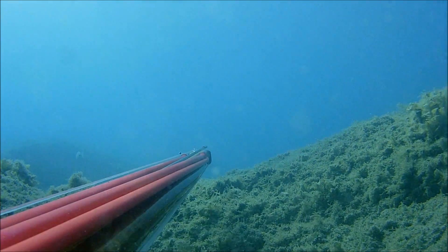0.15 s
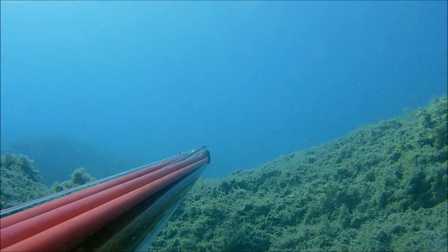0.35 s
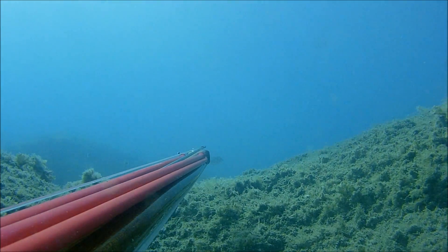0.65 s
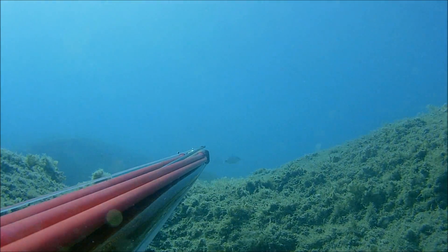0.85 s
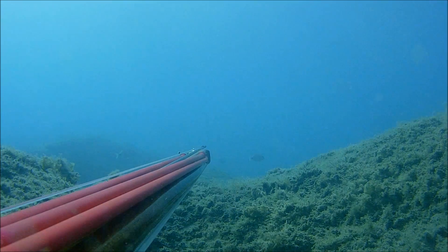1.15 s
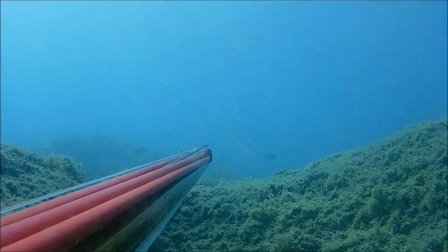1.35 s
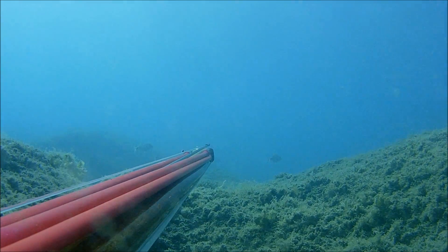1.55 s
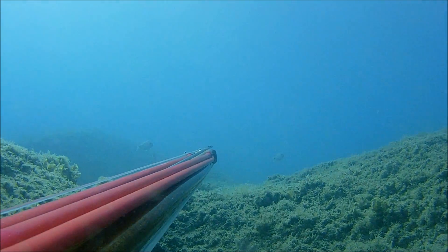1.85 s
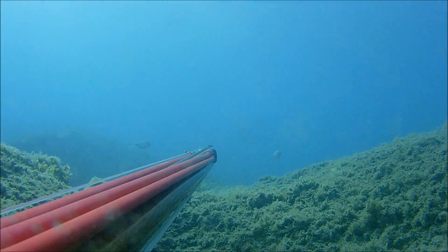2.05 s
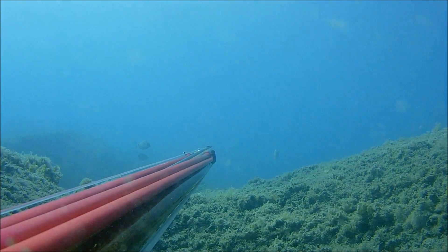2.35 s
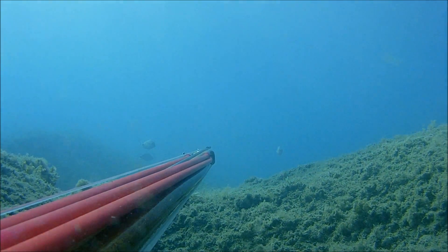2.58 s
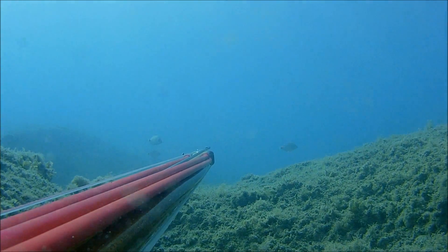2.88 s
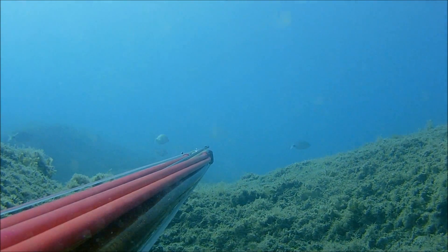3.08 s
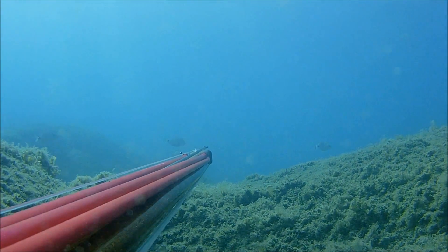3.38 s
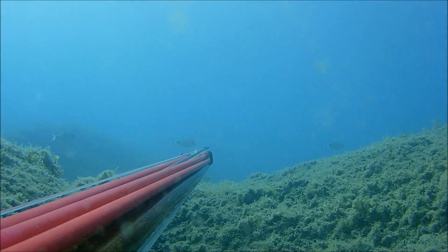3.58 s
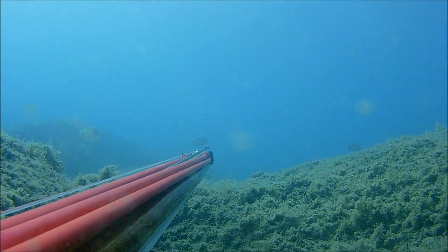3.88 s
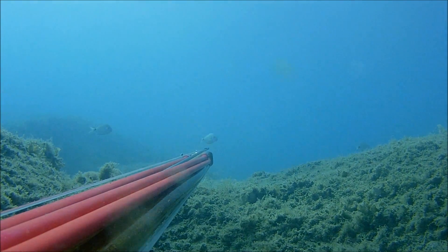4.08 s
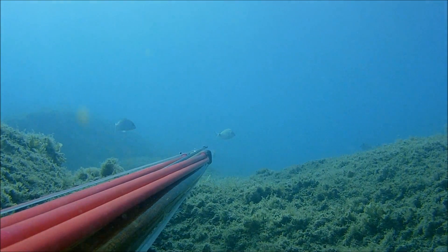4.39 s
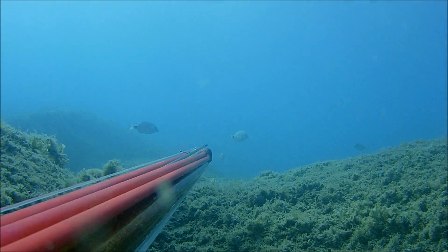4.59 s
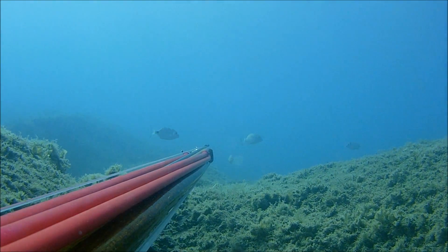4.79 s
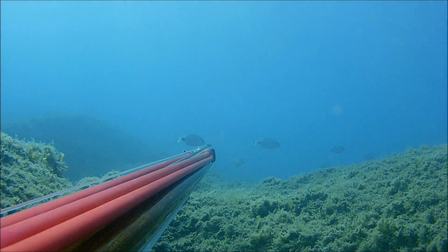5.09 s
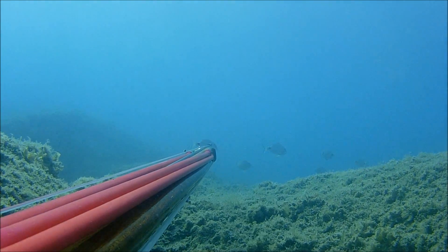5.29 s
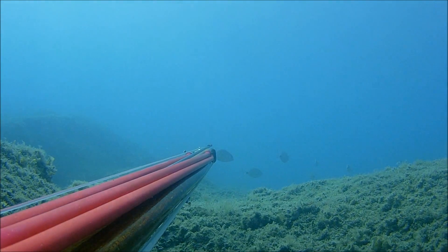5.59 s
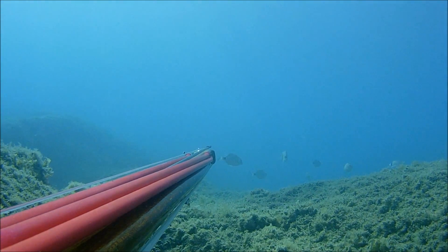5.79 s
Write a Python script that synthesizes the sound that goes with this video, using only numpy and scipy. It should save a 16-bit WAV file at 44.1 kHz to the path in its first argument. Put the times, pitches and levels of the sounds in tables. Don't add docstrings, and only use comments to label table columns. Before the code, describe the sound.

A quiet underwater bed over weedy rock: soft low rumble, faint steady hiss and very low slow water surge, strongest at the start. Over it runs constant, uneven crackling from snapping shrimp, a fine distant fizz of countless ticks with separate small clicks in front, many per second. Each is dry and tiny, ringing for a few milliseconds in the plastic housing around the microphone, with a short ragged rock echo. Brighter clicks cluster around 0.5-0.8 s, with others near 1.2 and 1.5 s. At about 2.26 s one sharp crack stands well above the rest. Dull, low bumps of water nudge the housing at 2.55-2.9 s, with a faint knock at 3.03 s. Clicks crowd together at 3.2-3.5 s. A strong snap comes at 4.87 s, another around 5.55 s, and a short, deep, muffled bump at 5.7 s before the crackle carries on to the end.

```python
import sys
import numpy as np
from scipy import signal
from scipy.fft import rfft, irfft
from scipy.io import wavfile
from scipy.ndimage import uniform_filter1d

SR = 44100
rng = np.random.default_rng(int(sys.argv[2]) if len(sys.argv) > 2 else 0)


def field_ratio(decibels):
    return 10 ** (np.asarray(decibels, dtype=float) / 20)


def wrap_up_sound(samples):
    columns = np.atleast_2d(samples).T
    tamed = np.clip(columns, -1, 1)
    steps = np.round(tamed * 32767).astype(np.int16)
    wavfile.write(sys.argv[1], SR, steps)


N = 261962


def shrimp():
    wall_hz = 1790
    stiff_wall = signal.butter(3, wall_hz, "high", fs=SR, output="sos")
    return signal.sosfilt(stiff_wall, near_snaps() + faint_snaps())


# start_s, low_db, middle_db, upper_db, top_db
NEAREST_SNAPS = [(0.4873, -36, -41, -45, -46), (0.666, -35, -41, -40.5, -49), (0.7446, -30, -46, -36, -55),
                 (0.7607, -31.5, -33.5, -35, -39), (1.1653, -40, -34, -63, -64),
                 (1.5308, -35, -32.5, -33, -43), (2.071, -41, -37.5, -40, -39.5),
                 (2.2558, -22, -17, -19, -20), (2.7631, -35.5, -33, -32.5, -60),
                 (2.839, -34, -33.5, -42, -48), (3.159, -46, -31, -32, -53), (3.283, -35, -32, -43, -61),
                 (3.311, -27, -41, -56, -73), (3.393, -40, -29.5, -44, -39), (3.397, -31, -39, -30.5, -52),
                 (3.506, -32, -40, -42, -60), (3.7254, -38.5, -42, -37, -51),
                 (4.0113, -41, -44, -36.5, -44.5), (4.8701, -43, -36, -38, -44),
                 (4.8719, -28, -23.5, -29.5, -38), (5.034, -40.5, -34.5, -50, -46.5),
                 (5.5461, -37, -35, -40, -50), (5.548, -26, -27, -30, -44), (5.714, -39, -44, -36, -62)]
# start_s, peak_db, brightness_db (per family)
DULL_SNAPS = [(0.2348, -34.5, -15), (0.239, -49, -5), (0.6713, -46, 6), (0.7495, -45, 5), (0.7583, -39, 4),
              (0.7995, -38, 3), (1.0246, -44.5, 4), (1.5799, -41, 1.5), (1.7703, -38.5, -1),
              (1.807, -36, 2), (2.264, -40, 2), (2.717, -42, -8), (2.8436, -49, 5), (3.0313, -41, 5.5),
              (3.3142, -30, -4), (3.3212, -40, -2), (3.4018, -46, 7), (3.5114, -40, 1), (3.568, -40, 3.5),
              (3.7722, -39.5, 2.5), (3.9372, -35.5, -3), (4.016, -44, 3), (4.0954, -40, -3),
              (4.1015, -38, 2), (4.1166, -40, 3), (4.5142, -43, 5.5), (4.6505, -45, -1), (4.8755, -32, 5),
              (5.398, -46, 1), (5.492, -41.5, -2)]
# start_s, peak_db, brightness_db (per family)
FULL_SNAPS = [(0.019, -42, -1.5), (0.4911, -39.5, 4.5), (0.767, -48, -7), (1.362, -40, -1),
              (1.4949, -42, 0), (1.9996, -43, -2), (2.0924, -45, 3), (2.2006, -43.5, -1), (2.321, -43, -2),
              (2.3326, -34.5, 0.5), (2.3348, -50, -2), (2.4972, -37.5, -0.5), (3.162, -43, 0.5),
              (3.2255, -44, -1), (3.2945, -41, 0), (3.4647, -40, 2.5), (3.5715, -50, 2), (3.711, -43, 0),
              (3.7557, -41, 0), (3.7686, -54.5, 12), (3.927, -45, -5), (4.1191, -37.5, -2),
              (4.3654, -42.5, 4.5), (4.4757, -35.5, -1), (4.478, -42, 1), (4.7587, -39, -2.5),
              (5.1157, -41.5, 1), (5.4276, -47, 4), (5.5508, -35, -1), (5.5927, -42.5, -0.5)]
# start_s, peak_db, brightness_db (per family)
THIN_SNAPS = [(0.031, -42.5, 9), (0.0509, -52, 8), (0.2158, -39, 0), (0.3396, -46, 3), (0.3498, -46, -3),
              (0.5947, -43.5, -0.5), (0.8222, -45.5, 3), (0.894, -49, 8), (0.9955, -42, 1.5),
              (1.0221, -47, 6), (1.23, -53, 10), (1.4764, -43, 3), (1.534, -43.5, -2.5), (1.7745, -43, 4),
              (1.7783, -42, 0), (1.842, -44, 6), (2.074, -43, 3), (2.5455, -53, 8), (2.7487, -42, -3),
              (2.769, -43, 0), (2.8015, -45, 6.5), (2.8551, -47, 1), (2.9893, -42.5, 1), (3.4767, -39, 1),
              (3.66, -53, 14), (4.0709, -40, -0.5), (4.289, -48, 7), (4.6254, -48, 5), (5.2464, -46.5, 1),
              (5.4894, -45.5, 10)]


def near_snaps():
    kinds = [  # table, level_db per mode family, pivot family
        (DULL_SNAPS, [1.5, -8, -13, -30], 0),
        (FULL_SNAPS, [-2.5, -1, -4.5, -15], 1),
        (THIN_SNAPS, [-4, -5.5, -0.5, -9], 2),
    ]
    columns = [np.transpose(NEAREST_SNAPS)]
    for table, kind_db, pivot in kinds:
        start_s, peak_db, bright_db = np.transpose(table)
        columns.append([start_s] + tilted(peak_db, bright_db, kind_db, pivot))
    start_s, *family_db = np.hstack(columns)
    above_db = np.max(family_db, axis=0) + 38
    is_nearest = np.arange(len(start_s)) < len(NEAREST_SNAPS)
    echo_db = np.where(is_nearest, -14.5 - 1.74 * above_db, -18 - 0.44 * above_db)
    return ring_snaps(start_s, family_db, echo_db, ragged_db=-16.0, ragged_t60_s=0.0086)


# start_s, peak_db, brightness_db (per family)
FAINT_SNAPS = [(0.096, -44, 1), (0.207, -49, 1), (0.342, -46, -1), (0.4338, -48, 1.5), (0.479, -51, 1),
               (0.5343, -44.5, 0), (0.8778, -49.5, 3.5), (0.904, -49.5, 0), (1.177, -48, 4.5),
               (1.2165, -48.5, 4), (1.557, -46.5, 0), (1.654, -45, 2.5), (1.9075, -46, 0.5),
               (2.1574, -45, 1), (2.1724, -47, 2), (2.3984, -48.5, 2.5), (2.4488, -51, 2),
               (2.8601, -47, -3.5), (2.9622, -47.5, -1), (3.1151, -46.5, 1.5), (3.6083, -50.5, 1),
               (3.7333, -43, 3), (3.9322, -49, 3), (3.97, -50, 0), (4.2553, -44.5, 1.5), (4.8191, -48.5, 1),
               (5.0516, -48, 1), (5.4527, -44, 2), (5.6708, -47, -2.5), (5.7727, -45, 0)]
# start_s, peak_db
FARTHER_SNAPS = [(0.0865, -50.5), (0.2489, -48.5), (0.3124, -53), (0.4087, -48), (0.4587, -49),
                 (0.518, -53), (0.6214, -47), (0.7005, -47), (0.734, -49), (0.9535, -50), (1.0674, -51),
                 (1.1242, -54), (1.2856, -49.5), (1.465, -48), (1.5432, -56), (1.5937, -46), (1.9732, -48),
                 (2.0585, -51), (2.233, -50), (2.9981, -56), (3.0208, -49), (3.6854, -50), (3.776, -55),
                 (3.9182, -45), (4.0537, -55), (4.447, -51), (4.5941, -46.5), (4.843, -46), (5.2302, -47),
                 (5.7275, -52)]


def faint_snaps():
    farther = np.c_[FARTHER_SNAPS, np.zeros(len(FARTHER_SNAPS))]
    start_s, peak_db, bright_db = np.vstack([FAINT_SNAPS, farther, scattered_snaps()]).T
    family_db = tilted(peak_db, bright_db, [-0.9, -2.5, -5.5, -11.5], pivot=1.4)
    echo_db = np.full(len(start_s), -12.5)
    return ring_snaps(start_s, family_db, echo_db, ragged_db=-16.5, ragged_t60_s=0.023)


def scattered_snaps(per_s=20, level_db=-57, spread_db=4, bright_spread_db=4):
    chance = rng.uniform(-1, 1, (int(per_s * N / SR), 3))
    start_s = (chance[:, 2] + 1.01) / 2.02 * N / SR
    return np.c_[start_s, level_db + spread_db * chance[:, 0], bright_spread_db * chance[:, 1]]


def tilted(peak_db, bright_db, family_db, pivot):
    return [peak_db + base_db + (k - pivot) * bright_db for k, base_db in enumerate(family_db)]


# mode_hz, level_db, t60_s
HOUSING = [
    [(2343, 9, 0.016), (2765, 7, 0.017), (2220, -37, 0.0067), (1356, -6, 0.027), (1630, -22, 0.029)],
    [(3493, 4, 0.015), (3870, 11, 0.0079), (3410, -10, 0.018)],
    [(4892, 4.5, 0.0074), (5410, -8, 0.014), (5890, -2, 0.01), (4315, -8, 0.015)],
    [(8040, 14, 0.0033), (8910, 14.5, 0.0046), (7290, 12.5, 0.0039), (9630, -5, 0.0074)],
]


def ring_snaps(start_s, family_db, echo_db, ragged_db, ragged_t60_s,
               echo_t60_s=0.057, rough_db=5, trim_db=-10):
    step = np.arange(-60, 2600)
    age_s = np.where(step < 0, -2.5 * step, step) / SR
    chance = rng.standard_normal((len(start_s), 3, len(step)))

    echo_level_db = echo_db[:, None] + trim_db - 60 * age_s / echo_t60_s
    echoes = chance[:, 0] * field_ratio(rough_db * chance[:, 1] + echo_level_db)
    ragged_level_db = ragged_db + 0.67 * (echo_db[:, None] + 17) - 60 * age_s / ragged_t60_s
    cracks = echoes * (step > 0) + chance[:, 2] * field_ratio(ragged_level_db)
    cracks[:, step == 0] = 1

    heard = 0
    for peak_db, family in zip(family_db, HOUSING):
        colour_db = 1.6 * rng.standard_normal((len(start_s), len(family)))
        rung = signal.fftconvolve(cracks, mode_response(family, colour_db), axes=1)[:, :len(step)]
        first_peak = np.abs(rung[:, :160]).max(axis=1)
        heard = heard + rung * (field_ratio(peak_db) / first_peak)[:, None]

    above_modes = signal.butter(2, 10000, "high", fs=SR, output="sos")
    bare_db = 0.6 * np.max(family_db, axis=0) - 25
    heard = heard + signal.sosfilt(above_modes, cracks) * field_ratio(bare_db)[:, None]

    at = (start_s[:, None] * SR).astype(int) + step
    return np.bincount(at.ravel(), heard.ravel(), N)[:N]


def mode_response(family, colour_db, rise_s=0.00019):
    t = np.arange(2048) / SR
    mode_hz, level_db, t60_s = np.array(family).T[:, :, None]
    swell = 1 - np.exp(-(t / rise_s) ** 2)
    modes = np.sin(2 * np.pi * mode_hz * t) * 1000. ** (-t / t60_s) * swell
    sign = (-1) ** np.arange(len(family))
    return (field_ratio(level_db[:, 0] + colour_db) * sign) @ modes


# time_s, crackle_db
COLONY = [(0.0, -57), (0.26, -61.5), (0.66, -60.5), (1.12, -60.5), (3.65, -58.5), (4.7, -58.5),
          (5.94, -60.5)]
COLONY_FAMILY_DB = [-1.5, -3.5, -4.5, -11.5]


def colony():
    flurry = field_ratio(4.7 * unit(uniform_filter1d(rng.standard_normal(N), size=1500)))
    shared = colony_ticks(flurry)
    crackle = 0
    for family, level_db in zip(HOUSING, COLONY_FAMILY_DB):
        ticks = shared + 0.26 * colony_ticks(flurry)
        rung = signal.fftconvolve(ticks, mode_response(family, 0))[:N]
        crackle = crackle + field_ratio(level_db) * unit(rung)
    return unit(crackle) * field_ratio(curve(COLONY) - 3.5)


def colony_ticks(flurry, per_s=1200, spread_db=1.5, largest_db=14):
    size_db = np.minimum(spread_db * rng.exponential(size=N), largest_db)
    size = field_ratio(size_db) * np.sign(rng.standard_normal(N))
    struck = rng.random(N) < per_s / SR
    return flurry * size * struck + 0.095 * rng.standard_normal(N)


# start_s, peak_db, pitch_hz, t60_s
BUMPS = [(2.564, -38, 88.6, 0.065), (2.591, -36.5, 139, 0.053), (2.625, -32.5, 224, 0.062),
         (2.628, -32.5, 108, 0.074), (2.664, -38, 118, 0.083), (2.844, -38.5, 103, 0.11),
         (2.886, -40.5, 98, 0.095), (3.034, -41, 1400, 0.02), (4.49, -51.5, 1314, 0.11),
         (5.666, -34, 110, 0.032), (5.677, -33, 125, 0.043), (5.685, -28, 108, 0.038),
         (5.689, -38, 264, 0.047)]


def bumps():
    out, t = np.zeros(N), np.arange(N) / SR
    for start_s, peak_db, pitch_hz, t60_s in BUMPS:
        age_s = np.maximum(t - start_s, 0)
        soft_onset = 1 - np.exp(-age_s / 0.0016)
        decay = field_ratio(-60 * age_s / t60_s)
        out -= field_ratio(peak_db) * np.sin(2 * np.pi * pitch_hz * age_s) * decay * soft_onset
    return out


# time_s, level_db
SURGE = [(0.0, -49), (0.38, -58), (3.85, -64), (4.02, -56), (4.42, -61), (5.94, -61.5)]


def surge():
    band = signal.butter(3, (21, 33), "band", fs=SR, output="sos")
    return unit(signal.sosfilt(band, rng.standard_normal(N))) * field_ratio(curve(SURGE))


# freq_hz, density_db (per Hz)
FLOOR = [(30, -8), (60, -3), (110, -0.5), (300, -1.5), (700, -8), (1300, -15), (1900, -19), (6500, -29),
         (10500, -32), (15500, -34.5)]


def floor(level_db=-52.5):
    freq_hz, density_db = np.transpose(FLOOR)
    bins_hz = np.maximum(np.fft.rfftfreq(N, 1 / SR), 1)
    shape = field_ratio(np.interp(np.log(bins_hz), np.log(freq_hz), density_db))
    return unit(irfft(rfft(rng.standard_normal(N)) * shape, N)) * field_ratio(level_db)


def curve(table):
    return np.interp(np.arange(N) / SR, *np.transpose(table))


def unit(x):
    return x / np.sqrt(np.mean(x ** 2))


def scene():
    return (shrimp() + colony() + bumps() + surge() + floor())[None]


def top_cut(x):
    return signal.sosfilt(signal.butter(12, 16530, fs=SR, output="sos"), x)


def record(dry):
    low_pass = signal.ellip(10, 0.1, 45, 15800, fs=SR, output="sos")
    mix = signal.sosfilt(low_pass, dry)
    return top_cut(mix)


dry = scene()
out = record(dry)
wrap_up_sound(out)
```